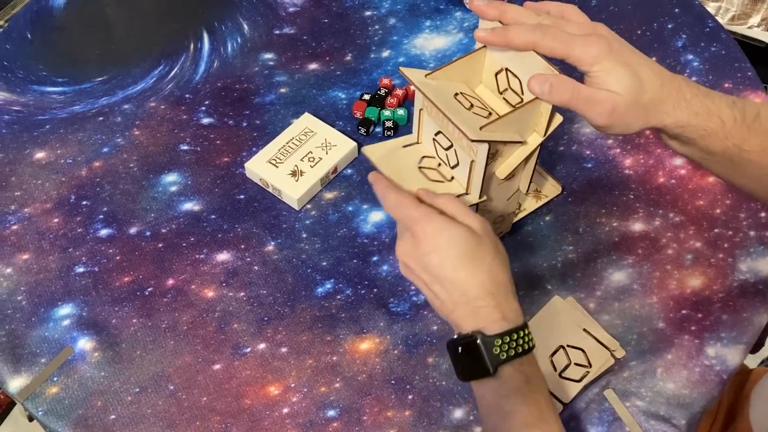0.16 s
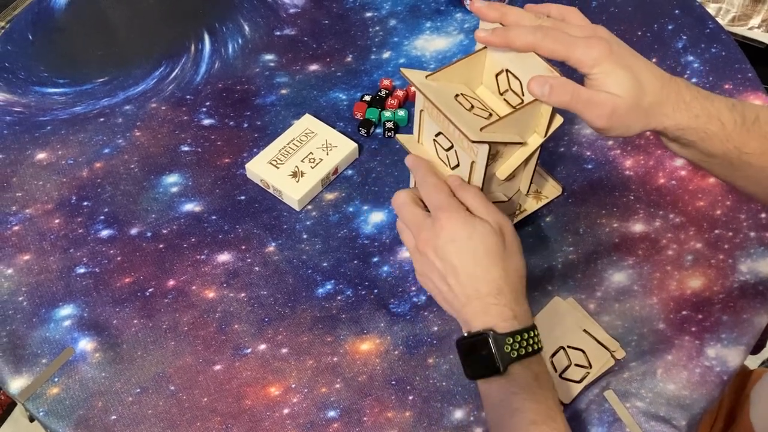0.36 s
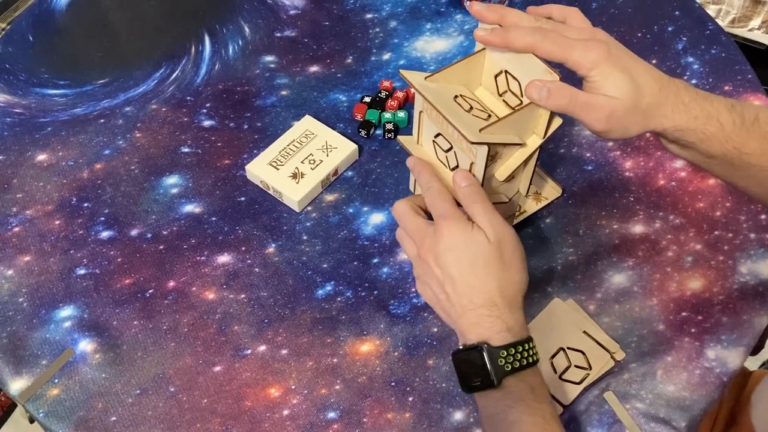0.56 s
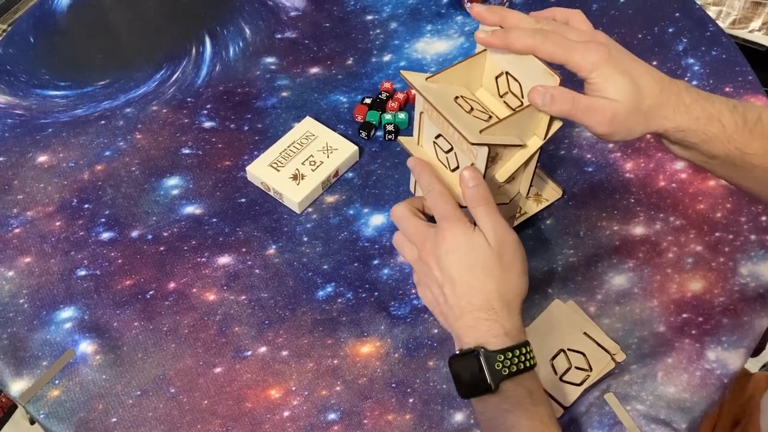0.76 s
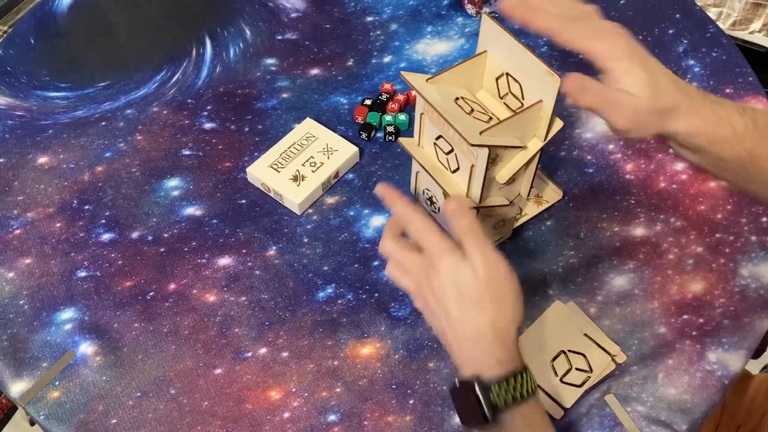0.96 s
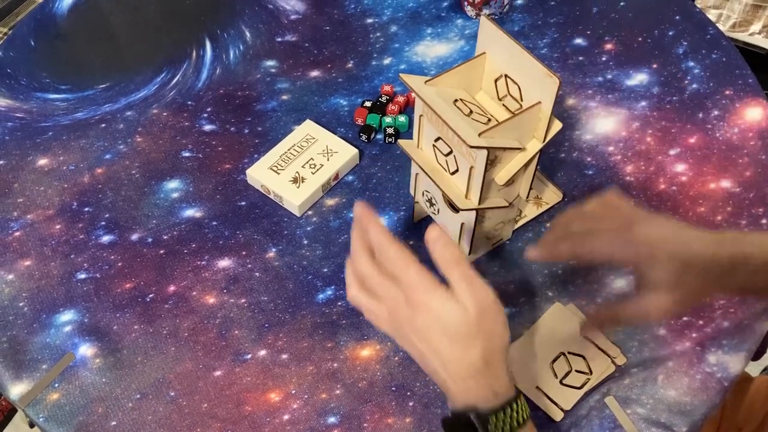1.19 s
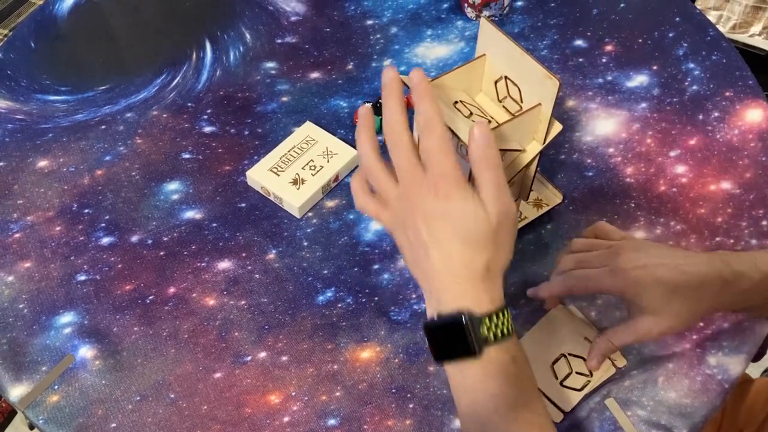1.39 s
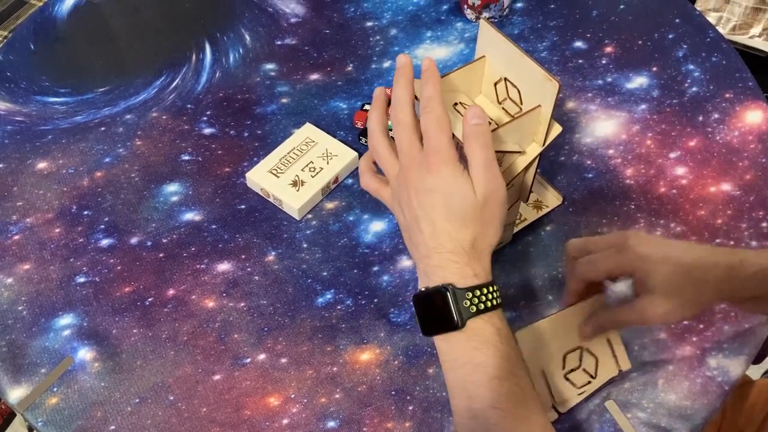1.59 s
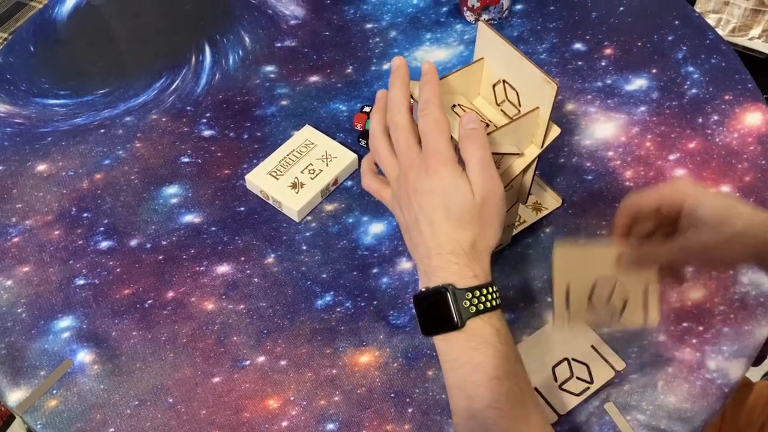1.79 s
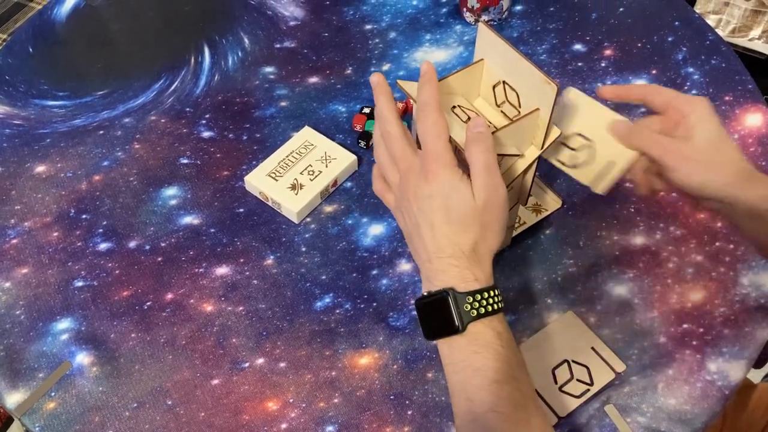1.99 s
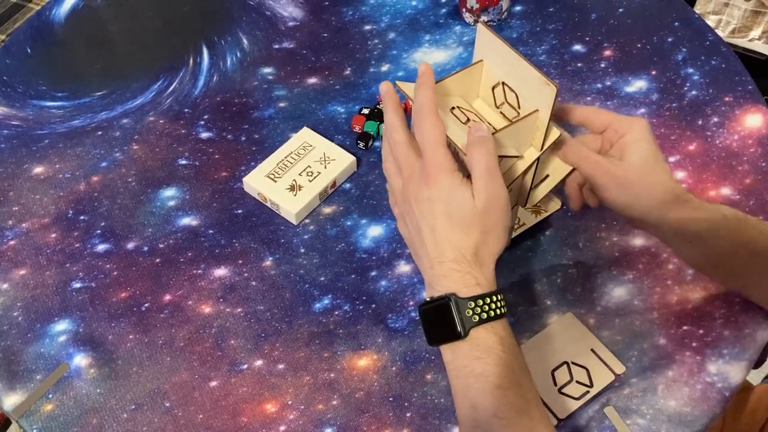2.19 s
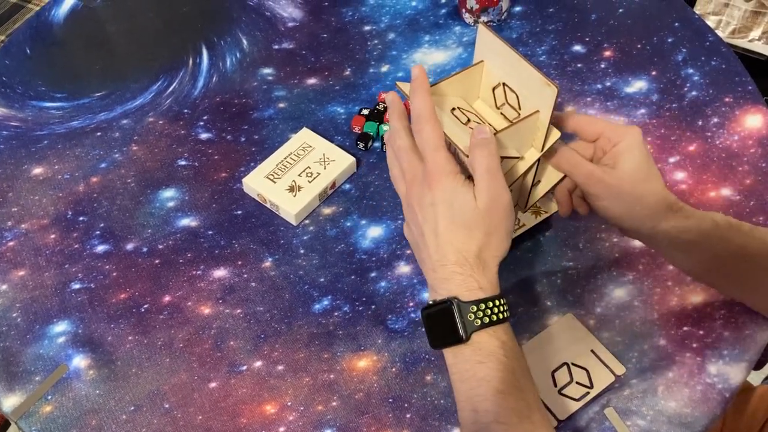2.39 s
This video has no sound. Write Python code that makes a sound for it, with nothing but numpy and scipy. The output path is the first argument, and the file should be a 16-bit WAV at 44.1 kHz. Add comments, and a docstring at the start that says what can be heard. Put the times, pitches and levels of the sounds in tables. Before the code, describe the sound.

Wooden panel sliding into place with a sharp double click, followed by a soft drag across cloth.

```python
"""Slotting wooden panels into a small tower

A cloth-covered table in a quiet room with a low hum, heard on a stereo pair of microphones.
One thin panel scrapes and squeaks down its slot and seats with a sharp double click; the tower ticks
as the hands let go. A second is dragged off the cloth and starts into its own slot. Hands bump the table."""
import sys
import numpy as np
from scipy import signal
from scipy.fft import rfft, irfft
from scipy.io import wavfile

SR = 44100
rng = np.random.default_rng(int(sys.argv[2]) if len(sys.argv) > 2 else 0)


def waveform_to_disk(signal):
    """Save audio, clipped to [-1, 1], as 16-bit WAV at the path in sys.argv[1]."""
    frames = np.transpose(np.atleast_2d(signal))
    scaled = np.clip(frames, -1, 1) * 32767
    samples = np.round(scaled).astype(np.int16)
    wavfile.write(sys.argv[1], SR, samples)


N = 108045
TIME = np.arange(N) / SR


def amp(db):
    """Decibels to gain."""
    return 10 ** (np.asarray(db) / 20)


def unit(x):
    """Scales to an rms of one."""
    return x / np.sqrt(np.mean(x ** 2) + 1e-20)


def read(points, hz):
    """Reads a table on a log-frequency axis."""
    f, value = np.transpose(points)
    return np.interp(np.log(hz + 1), np.log(f + 1), value)


def level(curve):
    """Gain over time from rows of time_s, level_db; silent outside them."""
    s, db = np.transpose(curve)[:2]
    return amp(np.interp(TIME, s, db)) * (TIME >= s[0]) * (TIME <= s[-1] + .01)


def add(mix, start_s, sound):
    """Mixes a sound in at a time."""
    part = mix[max(round(start_s * SR), 0):][:len(sound)]
    part += sound[:len(part)]


def colour(x, points, peaks=(), size=4096):
    """Causal filter of unit energy: a broad spectrum with resonances on top."""
    hz = abs(np.fft.fftfreq(size, 1 / SR))
    db = read(points, hz) + sum(boost / (1 + (2 * (hz - f) / width) ** 2) for f, width, boost in peaks)
    minimum_phase = np.exp(np.conj(signal.hilbert(np.log(amp(db)))))
    taps = np.fft.ifft(minimum_phase).real[:size // 2]
    return signal.fftconvolve(x, taps / np.linalg.norm(taps))[:len(x)]


def waver(hz, width_hz):
    """A narrow resonance kept sounding by chance pushes; at 0 Hz, a random wobble."""
    f = np.fft.fftfreq(N, 1 / SR)
    slow = np.fft.ifft(np.exp(2j * np.pi * rng.random(N)) / (1 + (2 * f / width_hz) ** 4) ** .5)
    carrier = np.exp(2j * np.pi * np.cumsum(hz * np.ones(N)) / SR)
    return unit((slow * carrier).real)


def fibres(hiss, per_s=2200, spread_db=3.5):
    """Friction: tiny slips of uneven size over a smooth hiss."""
    slipping = rng.random(N) < per_s / SR
    sizes = amp(spread_db * np.minimum(rng.exponential(1, N), 3.5))
    slips = slipping * sizes * rng.choice([-1, 1], N)
    return unit(unit(slips) + hiss * rng.standard_normal(N))


def grip(spread_db=2.3, width_hz=130):
    """An edge grips and lets go unevenly, so its sound rasps."""
    return unit(amp(spread_db * waver(0, width_hz)))


# Likeness of diffuse sound at the two microphones: frequency_hz, coherence
MIC_COHERENCE = [(50, 0.75), (130, 0.5), (280, 0.86), (600, 0.13), (2000, 0.033), (5500, 0.12),
                 (6800, 0.99), (16000, 1)]
def diffuse(pair):
    """Makes two unrelated channels as alike as diffuse sound is at the microphones."""
    (left, other), size = rfft(pair), pair.shape[1]
    same = np.clip(read(MIC_COHERENCE, np.fft.rfftfreq(size, 1 / SR)), -1, 1)
    right = same * left + np.sqrt(1 - same ** 2) * other
    return irfft(np.array([left, right]), size)


# Room air all around the microphones: frequency_hz, gain_db
AIR_COLOUR = [(20, -25.5), (45, -5), (75, -10.5), (173, -16), (313, -20.5), (509, -28.5), (684, -28),
              (1080, -37.5), (7300, -47.5), (15500, -44)]
# Hum of the room, alike in both microphones: pitch_hz, width_hz, level_db
HUM_TONES = [(54.1, 8.7, -61), (120, 21, -73), (684, 12, -82.5)]
def room_tone(air_db=-67.5):
    """Faint room air, a wavering low hum and a thin tone above it."""
    air_gain = amp(read(AIR_COLOUR, np.fft.rfftfreq(N, 1 / SR)))
    air = irfft(rfft(rng.standard_normal((2, N))) * air_gain, N)
    hum = sum(amp(db) * waver(hz, width) for hz, width, db in HUM_TONES)
    return amp(air_db) * unit(diffuse(air)) + hum


# A dull room tail dying away at the start, then dull rubs on the tower; two curves: time_s, level_db
TAIL_AND_RUBS = [
    [(0, -55.5), (.06, -72.5), (.16, -71), (.2, -60)],
    [(.84, -83.5), (.885, -61.5), (.91, -65), (.98, -59.5), (1.05, -95)],
]
# The tower shifting under the fingers: time_s, level_db
SHIFT_CURVE = [(.84, -90), (.868, -76), (.91, -72), (.92, -53.5), (.938, -73.5), (.969, -69), (.985, -82.5),
               (1.05, -94)]
# Skin brushing wood: time_s, level_db
BRUSH_CURVE = [(1.38, -90), (1.42, -73.5), (1.445, -78.5), (1.465, -90.5), (1.493, -58), (1.51, -63.5),
               (1.535, -89)]
# The loose panel turned in the hand: time_s, level_db
TURN_CURVE = [(2.09, -81), (2.16, -69.5), (2.225, -87.5), (2.258, -66.5), (2.37, -76)]
# Tone of the opening tail and rubs, of the brushes, and of the turning: frequency_hz, gain_db
DULL_TONE = [(80, -14), (300, 1), (700, -8), (1350, -9.5), (2200, -19.5), (4000, -22), (7000, -40)]
BRUSH_TONE = [(100, -11.5), (1900, -12.5), (2900, -4), (4200, 3), (5800, -6.5), (7500, 1), (16000, -9)]
TURN_TONE = [(100, -20), (1000, -10), (1550, 7), (2800, -7), (4200, -1), (5600, -16), (7500, -5),
             (16000, -15.5)]
def tail_and_fingers():
    """A dull room tail dies away; then skin on wood: dull rubs, bright brushes, the panel turned."""
    layers = [(level(BRUSH_CURVE) + level(SHIFT_CURVE), BRUSH_TONE),
              (level(TURN_CURVE), TURN_TONE),
              (sum(level(curve) for curve in TAIL_AND_RUBS), DULL_TONE)]
    return sum(colour(gain * fibres(hiss=1.064, per_s=3300, spread_db=2.5), tone)
               for gain, tone in layers)


# Hands on the table, reaching both microphones together: start_s, level_db, pitch_hz
HAND_BUMPS = [(.01, -44, 126), (.22, -48.5, 118), (0.347, -39.5, 124), (0.509, -43, 121.4),
              (0.971, -40, 121), (1.428, -54, 125.6), (1.679, -48.5, 132), (1.734, -46.5, 161.6),
              (2.028, -51, 113.3), (2.151, -51, 131.7)]
def table_bumps(rise_s=.012, t60_s=.14):
    """Hands press and leave the table, which answers with a soft low note."""
    out, t = np.zeros(N), np.arange(SR // 3) / SR
    envelope = (1 - np.exp(-t / rise_s)) * amp(-60 * t / t60_s)
    rustle_tone = [(40, -9.5), (140, -2.5), (350, -19), (800, -25), (3000, -55.5)]  # frequency_hz, gain_db
    for start_s, db, hz in HAND_BUMPS:
        rustle = colour(rng.standard_normal(len(t)), rustle_tone)
        add(out, start_s, amp(db) * envelope * (np.sin(2 * np.pi * hz * t) + .55 * rustle))
    return out


# At the tower, the first panel sliding home and the second starting in: time_s, level_db
FIRST_SLIDE = [(.066, -86), (.075, -65.5), (.15, -60), (.185, -47.5), (.205, -44.5), (.213, -38.5),
               (.245, -42.5), (.27, -36.5), (.294, -49.5), (.326, -44.5), (.336, -30), (.347, -42.5),
               (.39, -49.5), (.44, -60), (.49, -52.5), (.53, -75), (.6, -100)]
SECOND_SLIDE = [(2.368, -95), (2.376, -60), (2.412, -71.5), (2.428, -58.5), (2.45, -48.5)]
# Tone of the grit in the slot: frequency_hz, gain_db
SLOT_TONE = [(60, -19), (300, -22), (1100, -6.5), (1750, -9.5), (2500, -11.5), (3100, -17.5), (4300, -13.5),
             (5100, -18), (7000, -17.5), (12500, -17), (16000, -24)]
# Resonances of a panel held in its slot: pitch_hz, width_hz, gain_db
SLOT_RESONANCES = [(1290, 320, -4), (2400, 360, -7), (3620, 200, -12.5)]
def slot_scrape(bend_share=.015, bend_hz=30):
    """An edge catches on the slot's fibres; each resonance flares alone and drifts as the panel bends."""
    push = level(FIRST_SLIDE) + level(SECOND_SLIDE)
    grit = colour(push * grip() * fibres(hiss=.5, per_s=1100, spread_db=-1.5), SLOT_TONE)
    ringing = np.zeros(N)
    for hz, width, db in SLOT_RESONANCES:
        flare = amp(db) * grip()
        bent_hz = hz * (1 + bend_share * waver(0, bend_hz))
        ringing += flare * waver(bent_hz, width)
    return amp(-4) * grit + push * ringing


def ring(modes, t, tilt_db=0, spread_db=1.5, detune_share=.015, max_cycles=70):
    """Dying modes of struck wood, of unit total strength; each point of contact favours other modes."""
    hz, db, t60 = np.transpose(modes)[:, :, None]
    t60 = np.minimum(t60, max_cycles / hz)  # wood damps its high modes quickly
    favour, detune = rng.standard_normal((2, len(hz), 1))
    gain = amp(db + tilt_db * np.log2(hz / hz[0]) + spread_db * favour)
    sign = (-1) ** np.arange(len(hz))[:, None]
    tones = np.sin(2 * np.pi * hz * (1 + detune_share * detune) * t)
    return (sign * gain / np.linalg.norm(gain) * amp(-60 * t / t60) * tones).sum(0)


# Tone of edge meeting edge: frequency_hz, gain_db
CRACK_TONE = [(100, -17), (600, 5), (2200, 4), (3000, -1), (4300, 2), (6000, -3), (7500, 0.5), (9000, -6),
              (10300, -1), (13000, -17), (16000, -10.5)]
def crack(t, rise_s=.0011, t60_s=.018):
    """The short gritty burst of two edges meeting."""
    grit = rng.standard_normal(len(t)) * (1 - np.exp(-t / rise_s)) * amp(-60 * t / t60_s)
    return .5 * colour(grit, CRACK_TONE)


# Wood striking wood at the tower: start_s, ring_db, tilt_db_per_octave, crack_db, thud_db
STRIKES = [(0.0711, -48.5, -1.5, -51.5, -53), (0.2115, -32, 10, -44, -60), (.2613, -20.5, -6, -42, -46),
           (.281, -25, -8, -52, -54), (.333, -40, 2, -21.5, -71), (0.3381, -11, -9, -14.5, -31),
           (0.3403, -14, 4, -15, -18), (.347, -21, -2, -31.5, -47.5), (0.372, -13.5, 4, -15, -48.5),
           (0.3749, -24.5, 7.5, -11, -32), (0.3776, -26, -3, -28.5, -56.5),
           (0.489, -41.5, -0.5, -44.5, -50.5), (0.733, -59, -6, -76, -63), (0.951, -47.5, -8, -61.5, -57.5),
           (.9596, -42, 5, -36, -58), (0.974, -48, -5.5, -67.5, -58), (2.3745, -45.5, -3.5, -67, -55),
           (2.394, -45, -0.5, -76.5, -51.5), (2.431, -42, -1, -42, -51), (2.442, -43.5, 6, -44, -56)]
# A released panel settling in its slot: start_s, ring_db, crack_db
SETTLE_TICKS = [(.921, -35, -40.5), (.926, -56.5, -37)]
# Modes of a panel, the whole tower on the table, and a settling panel: pitch_hz, gain_db, t60_s
PANEL_MODES = [(979, 0, 0.02), (1114, 0, 0.016), (1295, 4.5, 0.018), (1416, 3.5, 0.03),
               (1760, -10.5, 0.013), (2036, 3.5, 0.014), (2176, 0, 0.031), (2725, -8.5, 0.031),
               (3433, -4, 0.028), (4080, -4, .035), (4590, -14.5, 0.025), (7220, -16, 0.022),
               (8280, -16, 0.026)]
TOWER_MODES = [(188.8, -7, 0.29), (224, -7.5, 0.22), (252.8, -0.5, 0.11), (304, -7, .11), (394.4, -3, 0.09),
               (528, -17, 0.21), (718.3, -15, .2)]
TICK_MODES = [(815, 4.5, 0.025), (1044, -10, 0.028), (4710, -5.5, 0.013), (7340, 4, 0.015)]
def knocks(ring_rise_s=.00048, thud_rise_s=.0032):
    """Each contact is a crack and the short ring of a panel; firm ones also thud through the tower."""
    out, t = np.zeros(N), np.arange(SR // 2) / SR
    onset = 1 - np.exp(-t / ring_rise_s)
    thud = ring(TOWER_MODES, t) * (1 - np.exp(-t / thud_rise_s))
    for start_s, ring_db, tilt_db, crack_db, thud_db in STRIKES:
        click = amp(crack_db) * crack(t) + amp(ring_db) * ring(PANEL_MODES, t, tilt_db) * onset
        add(out, start_s, click + amp(thud_db) * thud)
    for start_s, ring_db, crack_db in SETTLE_TICKS:
        add(out, start_s, amp(crack_db) * crack(t) + amp(ring_db) * ring(TICK_MODES, t) * onset)
    return out


# A panel's edge sticking, placed with the tower; the last, at 1.556 s, is the loose panel on the cloth:
# start_s, length_s, level_db, pitch_hz
EDGE_SQUEAKS = [(0.133, 0.0091, -54, 2482), (0.154, 0.031, -55, 3696), (0.212, 0.016, -47, 3580),
                (0.247, 0.033, -40, 3588), (1.556, 0.022, -62, 3940)]
def squeaks(width_hz=230):
    """Brief, ragged stick-slip tones that swell and let go."""
    out = np.zeros(N)
    for start_s, length_s, db, hz in EDGE_SQUEAKS:
        progress = np.clip((TIME - start_s) / length_s, 0, 1)
        swell = 2 * np.sqrt(progress * (1 - progress))
        out += amp(db) * swell * waver(hz, width_hz)
    return out


# On the cloth, the loose panel's face and then its thinner trailing edge: time_s, level_db
FACE_CURVE = [(1.545, -73), (1.572, -56.5), (1.63, -49), (1.676, -60.5), (1.715, -57.5), (1.735, -52),
              (1.755, -46.5), (1.772, -65), (1.83, -66), (1.88, -59.5), (1.95, -79), (2.01, -98.5)]
TRAIL_CURVE = [(1.7, -82), (1.76, -66), (1.813, -56.5), (1.852, -64.5), (1.9, -58.5), (1.952, -53.5),
               (1.975, -82)]
# Tone of the face and of the trailing edge: frequency_hz, gain_db
FACE_TONE = [(100, -13.5), (600, -0.5), (1100, -5.5), (2300, 2.5), (3300, -2), (4500, 2), (5700, -3),
             (8100, 1), (11500, 1), (16000, -5)]
TRAIL_TONE = [(1000, -25), (4400, -7), (5700, -14), (6700, -3), (8200, 1.5), (12500, -1.5), (16000, -7)]
# Resonances of the loose panel: pitch_hz, width_hz, boost_db
LOOSE_RESONANCES = [(4510, 660, 2), (8050, 380, 5.5)]
# Its edge catching on the cloth: start_s, level_db
CLOTH_SNAGS = [(1.69, -41), (1.7187, -40.5), (1.731, -38)]
# The panel singing at its own note: time_s, level_db, pitch_hz
PANEL_NOTE = [(1.678, -98, 1405), (1.697, -58.5, 1427), (1.711, -68, 1472), (1.737, -46.5, 1451),
              (1.773, -108, 1460), (1.841, -77, 1500), (1.879, -59.5, 1490), (1.899, -80, 1516),
              (1.959, -73, 1514)]
def table_drag(snag_rise_s=.003, snag_t60_s=.045):
    """A loose panel hisses over the cloth, catches in gritty bursts, then thins and sings as it lifts."""
    snags = sum(amp(db - 60 * abs(TIME - at) / snag_t60_s) * np.clip((TIME - at) / snag_rise_s, 0, 1)
                for at, db in CLOTH_SNAGS)
    slide = level(FACE_CURVE) * fibres(hiss=.93)
    trail = level(TRAIL_CURVE) * fibres(hiss=.93)
    grit = slide * np.sqrt(grip()) + snags * fibres(hiss=0)
    note_s, _, note_hz = np.transpose(PANEL_NOTE)
    note = level(PANEL_NOTE) * waver(np.interp(TIME, note_s, note_hz), width_hz=200)
    return colour(grit, FACE_TONE, LOOSE_RESONANCES) + colour(trail, TRAIL_TONE) + note


# Decay of the small room around the table: frequency_hz, t60_s
TAIL_DECAY = [(100, 0.24), (300, .46), (1000, 0.38), (3000, 0.44), (6000, 0.32), (10000, 0.17),
              (16000, 0.055)]
# Tone of its tail: frequency_hz, gain_db
TAIL_TONE = [(80, -12.5), (250, 4), (600, 4.5), (1500, -3), (4000, -3), (16000, -5)]
def room_echoes(x, tail_db=-13.5, gap_s=.0078, early_db=-7.5, early_t60_s=.1):
    """Quick reflections from table and tower, then the tail of a small room."""
    t = np.arange(SR) / SR
    hz, frame_s, bands = signal.stft(rng.standard_normal((2, SR)), SR, nperseg=256)
    bands *= amp(-60 * frame_s / read(TAIL_DECAY, hz)[:, None] + read(TAIL_TONE, hz)[:, None])
    tail = signal.istft(bands, SR, nperseg=256)[1][:, :SR] * np.clip(t / gap_s - 1, 0, 1)
    early = rng.standard_normal((2, SR)) * amp(-60 * t / early_t60_s) * (t > .001)
    echoes = diffuse(amp(tail_db) * unit(tail) + amp(early_db) * unit(early)) / np.sqrt(SR)
    return signal.fftconvolve(x[None], echoes, axes=1)[:, :N]


def placed(x, left_lead_s, below_hz=6300):
    """Below the high treble, direct sound reaches the nearer microphone first."""
    hz = np.fft.rfftfreq(N, 1 / SR)
    lead_s = left_lead_s * (1 - np.tanh((hz - below_hz) / 200)) / 2
    turn = np.exp(1j * np.pi * hz * lead_s)
    return irfft(rfft(x) * np.array([turn, 1 / turn]), N)


def scene():
    """The tower a little nearer the left microphone, the loose panel and fingers nearer the right."""
    tower = slot_scrape() + squeaks() + knocks()
    loose = table_drag() + tail_and_fingers()
    bumps = table_bumps()
    direct = placed(tower, left_lead_s=.00006) + placed(loose, left_lead_s=-.000045) + bumps
    return direct + room_echoes(tower + loose + bumps) + room_tone()


# Balance of the microphone pair: frequency_hz, left_minus_right_db
MIC_BALANCE = [(40, -1), (125, -0.5), (300, 1.7), (1000, 3), (2200, 2.5), (3800, 1.5), (7000, 0),
               (16000, 0.5)]
def record(dry):
    """Two microphone ports: the left is louder in the mids and lags in the treble; then the band limit."""
    lag_s, lag_from_hz, band_limit_hz = .00022, 6830, 15800
    hz = np.fft.rfftfreq(N, 1 / SR)
    treble_lag = np.exp(-1j * np.pi * lag_s * np.maximum(hz - lag_from_hz, 0))
    lean = amp(read(MIC_BALANCE, hz) / 2) * treble_lag
    ports = irfft(rfft(dry) * np.array([lean, 1 / lean]), N)
    lowpass = signal.firwin(511, band_limit_hz, window=("kaiser", 9), fs=SR)
    return signal.oaconvolve(ports, lowpass[None], "same")


dry = scene()
out = record(dry)
waveform_to_disk(out)
```